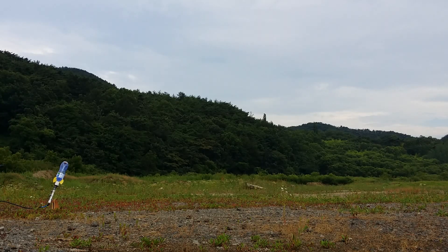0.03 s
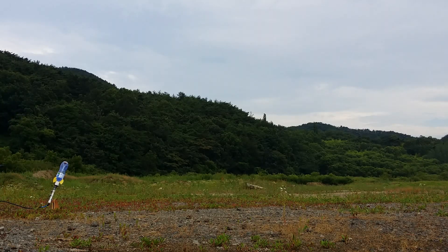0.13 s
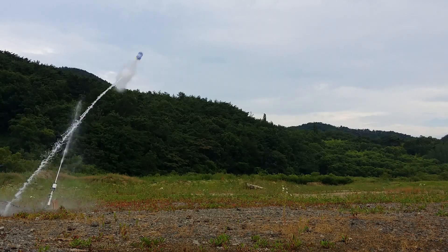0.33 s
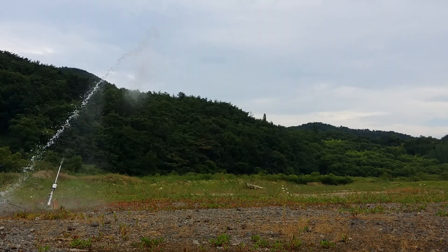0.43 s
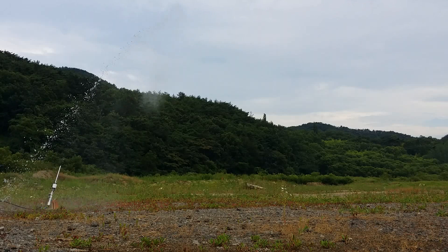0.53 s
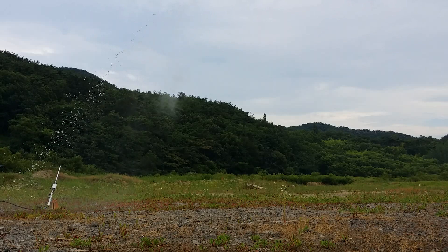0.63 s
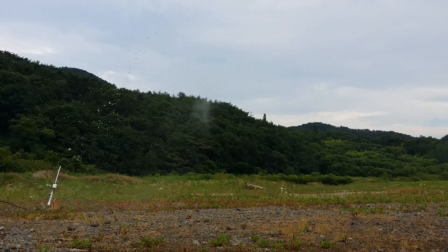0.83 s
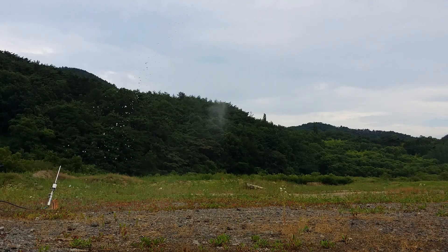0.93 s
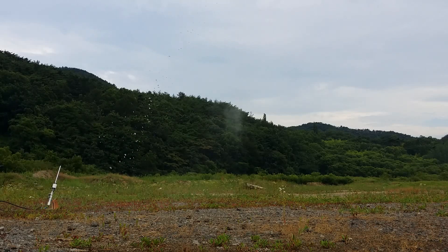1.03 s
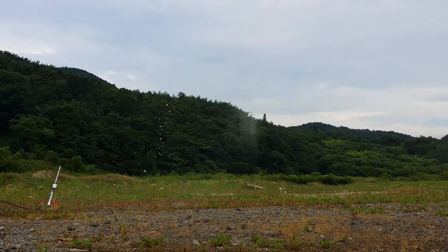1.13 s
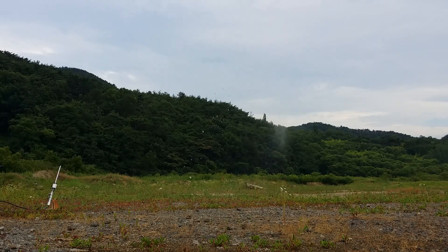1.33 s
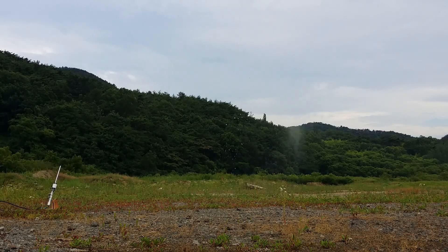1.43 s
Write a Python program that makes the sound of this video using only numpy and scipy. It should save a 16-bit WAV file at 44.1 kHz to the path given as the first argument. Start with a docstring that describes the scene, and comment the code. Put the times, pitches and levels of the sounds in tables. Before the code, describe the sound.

Quiet meadow with shrill insects and low wind on the microphone, then a sudden water rocket crack and hissing whoosh, slightly clipped, followed by a brief splash, fine spray and a soft echo from a wooded hill.

```python
"""Water rocket launch in an open field

Left of the listener, a nozzle spits and cracks free: short noise bursts and pushes that ring the bottle.
A water jet, an air blast, spray and a splashdown follow as coloured, grainy noise; single drops tap.
Insects sing throughout, low noise and short eddies make the wind, and a gain control ducks the launch."""
import sys
import numpy as np
from scipy import signal
from scipy.fft import rfft, irfft, next_fast_len
from scipy.io import wavfile
from scipy.ndimage import minimum_filter1d, map_coordinates

SR = 44100
rng = np.random.default_rng(int(sys.argv[2]) if len(sys.argv) > 2 else 0)


def master(y):
    """Save y as 16-bit WAV."""
    cut = np.clip(np.atleast_2d(y).T, -1, 1)
    pcm = np.round(cut * 32767)  # scale
    wavfile.write(sys.argv[1], SR, pcm.astype(np.int16))


N = 66150

# lead of the left port over the right
STAND_LEAD_MS, ALOFT_LEAD_MS, GROUND_LEAD_MS = .14, .08, .15
# bright burst spectrum: [f/Hz, relative density/dB]
SNAP_SPECTRUM = [(200, -25), (1500, -13), (3500, -7.5), (5200, 1), (6800, -1.5), (9000, .5), (11500, -8),
                 (14000, -8.5), (16000, -12)]
# fine spray spectrum: [f/Hz, relative density/dB]
SPRAY_SPECTRUM = [(150, -3), (800, -10), (2100, -9), (3000, -.5), (4200, .5), (6300, -1), (8500, -2),
                  (12000, -8), (16000, -12)]


def amp(db):
    """dB to amplitude."""
    return 10 ** (np.asarray(db) / 20)


def unit(x):
    """Scale to rms 1."""
    return x / np.sqrt(np.mean(x ** 2) + 1e-20)


def clock():
    """Time axis in s."""
    return np.arange(N) / SR


def along(points, hz):
    """Interpolate (Hz, value) points on a log frequency axis."""
    f, value = np.transpose(points)
    return np.interp(np.log(hz + 1), np.log(f + 1), value)


def wobble(rate_hz):
    """Smooth random curve with rate_hz knots a second."""
    knots = rng.standard_normal(int(N * rate_hz / SR) + 4)
    return map_coordinates(knots, [clock() * rate_hz])


def filtered(x, response):
    """Multiply the spectrum of x by a complex response of frequency."""
    size = next_fast_len(N + SR // 2)
    hz = np.fft.rfftfreq(size, 1 / SR)
    return irfft(rfft(x, size) * response(hz), size)[..., :N]


def noise(spectrum, grain_db=0, channels=1):
    """Coloured noise of rms 1; fast random gain breaks it into droplets."""
    white = rng.standard_normal((channels, N))
    grain = np.array([wobble(2500) for _ in range(channels)])
    return unit(filtered(white * amp(grain_db * grain), lambda hz: amp(along(spectrum, hz))))


def envelope(peak_s, db, rise_db_per_s, hold_s, fall_db_per_s):
    """Rise, hold and fall, straight in dB."""
    t = clock()
    rise_db = rise_db_per_s * np.maximum(peak_s - t, 0)
    fall_db = fall_db_per_s * np.maximum(t - peak_s - hold_s, 0)
    return amp(db - rise_db - fall_db)


def dying(start_s, t60_s):
    """Exponential decay from start_s, 60 dB in t60_s."""
    age_s = clock() - start_s
    return (age_s >= 0) * amp(-60 * np.abs(age_s) / t60_s)


def ports(x, lead_ms):
    """Sound from the left reaches the left port first; each port has its own colour."""
    # port responses: [f/Hz, gain/dB]
    left_colour = [(300, -1.3), (1000, -1.4), (3000, -.5), (4800, 1), (6300, 3.5), (8300, -4), (10000, -3),
                   (13000, 0)]
    right_colour = [(300, 1.3), (1000, 1.4), (3000, .5), (4800, -1), (6300, -3), (8300, 3), (10000, 2.5),
                    (13000, 0)]

    def response(hz):
        half_lead = np.exp(1j * np.pi * hz * lead_ms / 1000)
        left = amp(along(left_colour, hz)) * half_lead
        right = amp(along(right_colour, hz)) / half_lead
        return np.array([left, right])

    return filtered(x, response)


def flow(shape, spectrum, lead_ms, grain_db, flutter_db, spread):
    """Turbulent droplet stream; spread is the power share independent between the ports."""
    common = np.sqrt(1 - spread) * noise(spectrum, grain_db)
    separate = np.sqrt(spread) * noise(spectrum, grain_db, channels=2)
    stream = unit((common + separate) * amp(flutter_db * wobble(180)))
    return ports(envelope(*shape) * stream, lead_ms)


def meadow():
    """Distant air and a shrill insect chorus as noise; one cricket as a phase-wobbled tone."""
    # insect chorus spectrum: [f/Hz, relative density/dB]
    insect_spectrum = [(3500, -30), (5000, -13), (5700, -7), (6200, 0), (6700, 0), (7200, -8), (8100, -8),
                       (9200, -22), (14000, -40)]
    # distant air spectrum: [f/Hz, relative density/dB]
    field_spectrum = [(30, 6), (200, 2), (400, 1), (1000, -4), (2000, -10), (2700, -7), (4000, -9),
                      (8000, -13), (10500, -19), (16000, -19)]
    # cricket trills: [start t/s, length/s, level/dB]
    trills = [(-.05, .1, -66), (1.19, .1, -66)]
    trill_hz, field_db, insect_db = 3340, -59.3, -61
    t = clock()

    chorus_db = insect_db + 1.1 * wobble(60) + [[2.5], [-2.5]]  # stronger on the left
    chorus = amp(chorus_db) * noise(insect_spectrum, channels=2)

    trill = np.zeros(N)
    for start_s, length_s, db in trills:
        phase = np.clip((t - start_s) / length_s, 0, 1)
        trill += amp(db) * np.sqrt(np.abs(np.sin(np.pi * phase)))
    cricket = trill * np.sin(2 * np.pi * trill_hz * t + .5 * wobble(70))

    air = unit(noise(field_spectrum, channels=2) + .7 * noise(field_spectrum))
    return chorus + cricket + amp(field_db) * air


def wind():
    """Low rumble, stronger on the left port, and short eddies that rock the air at the ports."""
    # rumble spectrum: [f/Hz, relative density/dB]
    wind_spectrum = [(20, -11), (60, 1), (95, 0), (160, -4), (250, -16), (500, -34), (1500, -70)]
    # eddies: [centre t/s, level/dB, Gaussian sigma/s, f/Hz, left-right difference/dB]
    bumps = [(.03, -38, .018, 85, 16), (.092, -31, .018, 95, 22), (.165, -42, .03, 85, 6),
             (.607, -29, .009, 125, 24), (.683, -32, .011, 105, 14), (.80, -48, .02, 90, 0),
             (.888, -33, .008, 120, 20), (.95, -42, .012, 90, 10), (1.135, -39, .012, 95, 20),
             (1.195, -46, .012, 90, -6), (1.235, -45, .014, 95, 20), (1.338, -34, .013, 75, 20),
             (1.412, -37, .014, 100, 20), (1.452, -41, .015, 75, 12)]
    base_db, gust_db, gust_end_s = -51.5, 3.5, .7
    t = clock()

    fading_gust_db = gust_db / (1 + (t / gust_end_s) ** 10)
    lumps_db = 2.5 * np.array([wobble(12), wobble(12)])
    rumble_db = base_db + fading_gust_db + lumps_db + [[3], [-3]]
    out = amp(rumble_db) * noise(wind_spectrum, channels=2)

    for centre_s, db, sigma_s, hz, pan_db in bumps:
        age_s = t - centre_s
        bell = np.exp(-.5 * (age_s / sigma_s) ** 2)
        eddy = bell * np.sin(2 * np.pi * hz * age_s + .9 * wobble(110))
        port_db = db + np.minimum([[pan_db], [-pan_db]], 0)  # only the weaker port is cut
        out = out + amp(port_db) * eddy
    return out


def forest():
    """Return from a wooded hill: a late, soft noise wash, partly shared by the ports."""
    # wash spectrum: [f/Hz, relative density/dB]
    forest_spectrum = [(100, 6), (400, -1), (800, -2), (1300, 0), (2000, -6), (2800, -3), (4500, -2),
                       (8000, -12), (16000, -25)]
    # envelope: (peak t/s, level/dB, rise/(dB/s), hold/s, fall/(dB/s))
    echo_shape = (.62, -57, 70, .12, 20)
    wash = unit(noise(forest_spectrum, channels=2) + noise(forest_spectrum))
    return envelope(*echo_shape) * amp(1.5 * wobble(30)) * wash


def drops():
    """Single drops tap on the gravel: decaying noise, each around its own pitch."""
    # taps: [t/s, level before ports and pan/dB, f/Hz, t60/s]
    tap_table = [(.517, -37, 7000, .006), (.545, -38, 9000, .006), (.56, -35, 6000, .014),
                 (.589, -39, 5000, .008), (.662, -37, 8000, .006), (.714, -32, 190, .022),
                 (1.282, -49, 380, .03), (1.359, -44, 900, .008), (1.375, -51, 1100, .008),
                 (1.4445, -36.5, 500, .012)]
    skirt_db = -34  # two octaves from the pitch
    taps = 0
    for start_s, db, hz, t60_s in tap_table:
        band = [(hz / 4, skirt_db), (hz, 0), (hz * 4, skirt_db), (hz * 16, 3 * skirt_db)]
        taps = taps + amp(db) * dying(start_s, t60_s) * noise(band)
    return ports(taps, GROUND_LEAD_MS) * amp([[2], [-2]])


def fallout():
    """The water column splashes on the ground; fine spray patters as grainy noise."""
    # splash spectrum: [f/Hz, relative density/dB]
    splash_spectrum = [(150, -16), (400, -12), (500, -6), (575, 5), (650, -7), (850, -8), (1200, -18),
                       (2500, -30), (6000, -50)]
    # envelopes: (peak t/s, level before ports/dB, rise/(dB/s), hold/s, fall/(dB/s))
    splash_shape = (.535, -38, 270, .027, 480)
    spray_shape = (.50, -42.5, 50, .06, 115)
    drizzle_shape = (.62, -54, 60, .05, 17)
    splash = flow(splash_shape, splash_spectrum, GROUND_LEAD_MS, grain_db=4, flutter_db=2.5, spread=.05)
    spray = flow(spray_shape, SPRAY_SPECTRUM, GROUND_LEAD_MS, grain_db=4, flutter_db=1.2, spread=.3)
    drizzle = flow(drizzle_shape, SPRAY_SPECTRUM, GROUND_LEAD_MS, grain_db=4.5, flutter_db=1, spread=.25)
    return splash + spray + drizzle


def blast():
    """Escaping air: a dull roar and a bright hiss, then a wider wash scattered by the field."""
    # roar, hiss and field echo spectra: [f/Hz, relative density/dB]
    roar_spectrum = [(50, -9), (120, -6), (230, -6), (330, 1.5), (480, 2.5), (660, -5), (870, -1),
                     (1170, -9), (1500, -7), (1800, 0), (2200, -2), (3000, -8), (4500, -8), (9000, -28)]
    air_spectrum = [(300, -25), (1500, -6), (3300, -1), (4400, 3), (6000, -1), (9000, -3), (12000, -10),
                    (16000, -13)]
    echo_spectrum = [(60, 4), (300, -2), (800, -6), (1300, -3), (1900, -1), (3000, -3), (4300, 0),
                     (6500, 1), (9000, -3), (13000, -11), (16000, -15)]
    # envelopes: (peak t/s, level before ports/dB, rise/(dB/s), hold/s, fall/(dB/s))
    roar_shape = (.359, -16, 800, .006, 1250)
    hiss_shape = (.358, -14, 1700, .01, 1400)
    echo_shape = (.381, -32.5, 800, .02, 170)
    roar = flow(roar_shape, roar_spectrum, ALOFT_LEAD_MS, grain_db=3, flutter_db=2, spread=.03)
    hiss = flow(hiss_shape, air_spectrum, ALOFT_LEAD_MS, grain_db=3.5, flutter_db=1.5, spread=.35)
    echo = flow(echo_shape, echo_spectrum, ALOFT_LEAD_MS, grain_db=2, flutter_db=1.5, spread=.5)
    return roar + hiss + echo


def jet():
    """Water tears out of the nozzle: low gush and bright hiss, then mist."""
    # gush spectrum: [f/Hz, relative density/dB]
    gush_spectrum = [(50, -5), (250, 0), (500, 0), (750, -1), (1000, -2), (1500, -10), (4000, -11),
                     (6000, -16), (14000, -24)]
    # envelopes: (peak t/s, level before ports/dB, rise/(dB/s), hold/s, fall/(dB/s))
    gush_shape = (.246, -30, 1000, .048, 650)
    hiss_shape = (.231, -28.5, 2800, .057, 400)
    mist_shape = (.314, -27.5, 500, .018, 400)
    gush = flow(gush_shape, gush_spectrum, STAND_LEAD_MS, grain_db=3, flutter_db=3, spread=.02)
    hiss = flow(hiss_shape, SNAP_SPECTRUM, STAND_LEAD_MS, grain_db=4, flutter_db=2, spread=.04)
    mist = flow(mist_shape, SPRAY_SPECTRUM, STAND_LEAD_MS, grain_db=3.5, flutter_db=1.5, spread=.3)
    return gush + hiss + mist


def release():
    """The seal spits and lets go: each crack is a short burst and a push that rings the bottle."""
    # nozzle cracks, before ports: [t/s, burst level/dB, push level/dB, burst t60/s]
    cracks = [(.2312, -21, -32, .016), (.2355, -17, -27, .016), (.2451, -9, -18, .005),
              (.2471, -17, -20, .009), (.2644, -1, 0, .008), (.2664, -11, -12, .022),
              (.2695, -14, -26, .008), (.2728, -18, -30, .012)]
    # bottle resonances: [f/Hz, bandwidth/Hz, relative level/dB]
    bottle = [(120, 130, -1), (350, 170, 4), (520, 130, -1), (760, 170, 0), (1350, 200, -12),
              (1790, 170, -12), (2130, 170, -16), (3000, 200, -12)]

    def body(hz):
        return sum(amp(db) * 1j * hz * width_hz / (centre_hz ** 2 - hz ** 2 + 1j * hz * width_hz)
                   for centre_hz, width_hz, db in bottle)

    ring = filtered(signal.unit_impulse(N), body)
    ring = ring / np.abs(ring).max()

    bursts, pushes = np.zeros(N), np.zeros(N)
    for start_s, burst_db, push_db, t60_s in cracks:
        bursts += amp(burst_db) * dying(start_s, t60_s)
        pushes[round(start_s * SR)] += amp(push_db)
    snaps = bursts * noise(SNAP_SPECTRUM)
    thumps = signal.fftconvolve(pushes, ring)[:N]
    return ports(snaps + thumps, STAND_LEAD_MS)


def scene():
    """Sum of all sources at the two ports."""
    return meadow() + wind() + forest() + drops() + fallout() + blast() + jet() + release()


def record(dry):
    """Gain control ducks on loud sound, holds and recovers; peaks clip, then a band limit."""
    threshold_db, max_duck_db, hold_s, recover_s = -20, 4, .68, .3
    top_hz = 15650
    power = signal.lfilter(np.ones(256) / 256, 1, np.mean(dry ** 2, axis=0))
    need_db = np.clip(10 * np.log10(np.abs(power) + 1e-12) - threshold_db, 0, max_duck_db)
    # hold: largest need over the past hold_s
    size = int(hold_s * SR) | 1
    held_db = -minimum_filter1d(-need_db, size, origin=size // 2, mode="constant")
    # recovery: the duck shrinks no faster than the ramp
    ramp_db = clock() * max_duck_db / recover_s
    duck_db = np.maximum.accumulate(held_db + ramp_db) - ramp_db
    clipped = np.clip(dry * amp(-duck_db), -1, 1)
    return filtered(clipped, lambda hz: hz < top_hz)


dry = scene()
out = record(dry)
master(out)
```